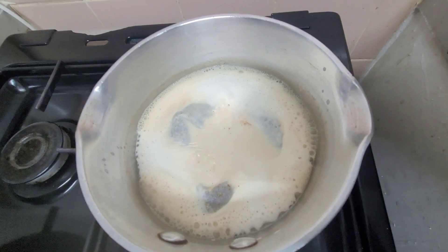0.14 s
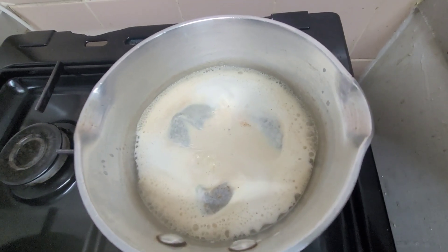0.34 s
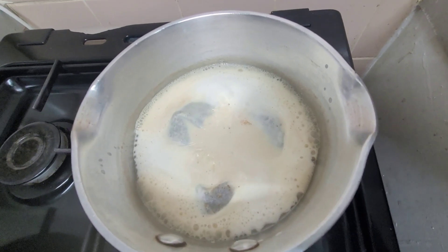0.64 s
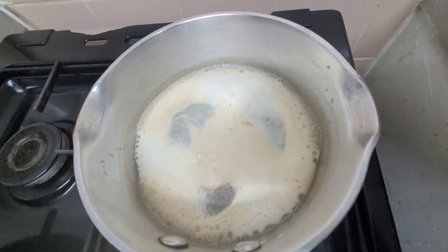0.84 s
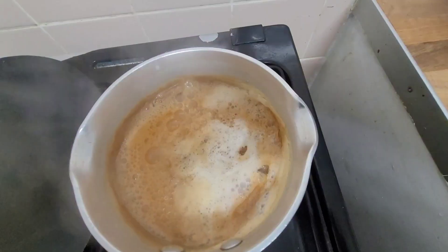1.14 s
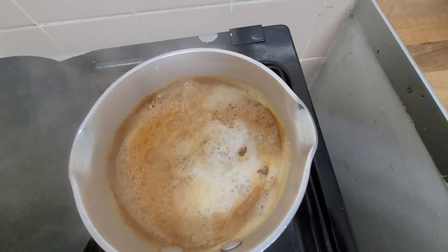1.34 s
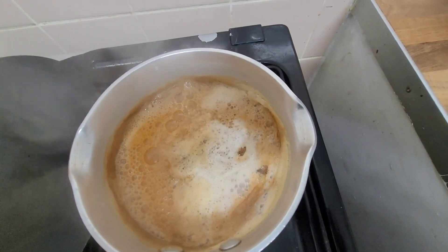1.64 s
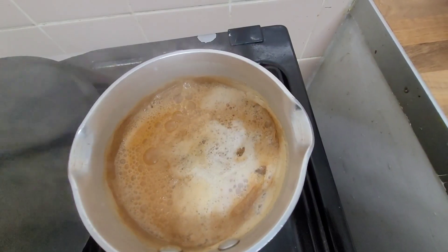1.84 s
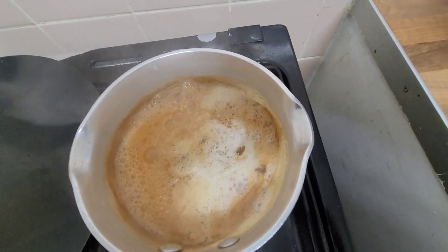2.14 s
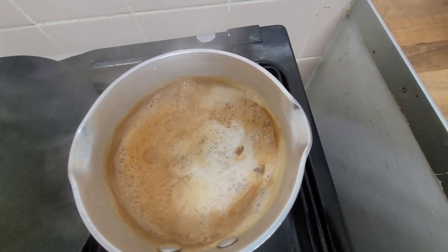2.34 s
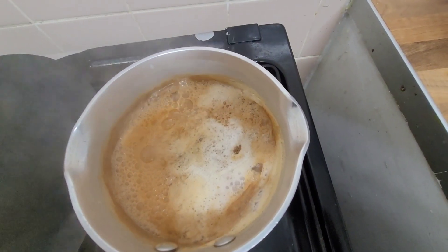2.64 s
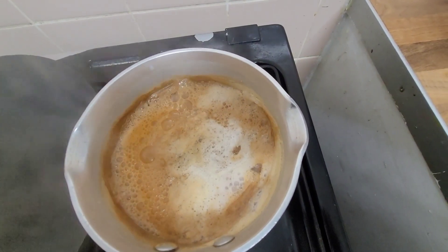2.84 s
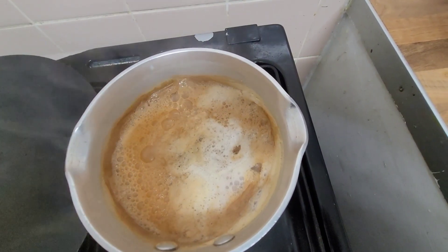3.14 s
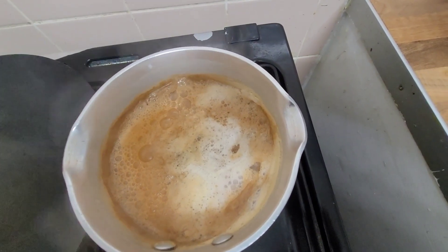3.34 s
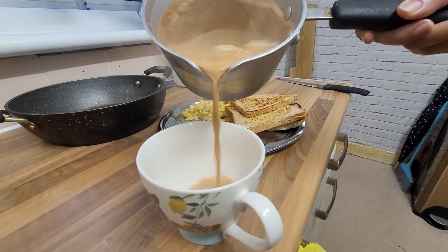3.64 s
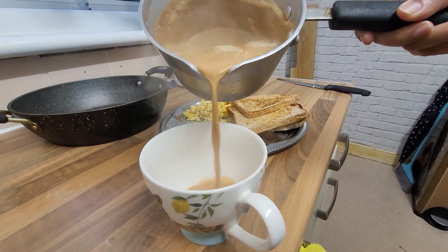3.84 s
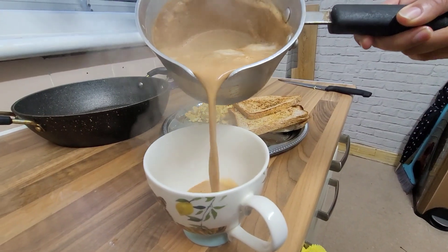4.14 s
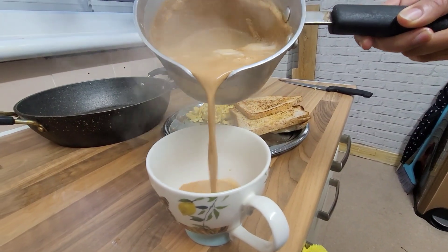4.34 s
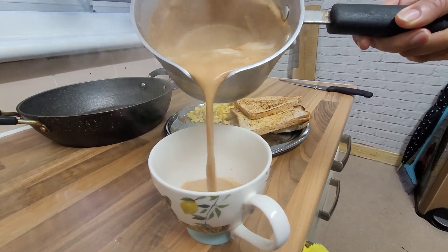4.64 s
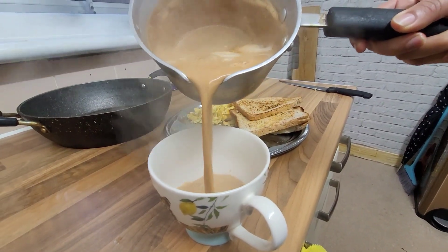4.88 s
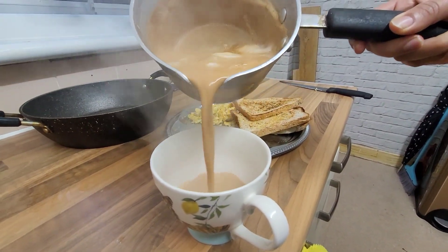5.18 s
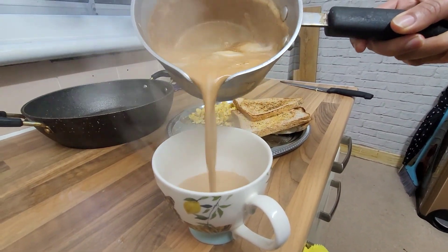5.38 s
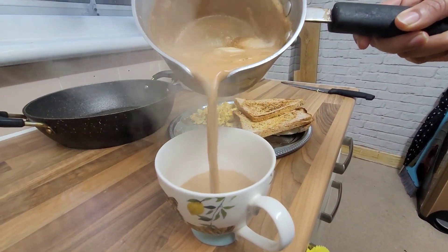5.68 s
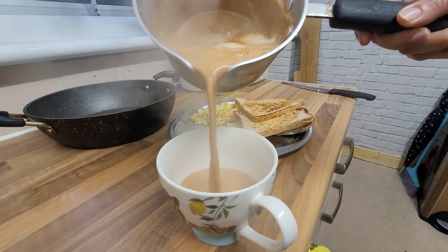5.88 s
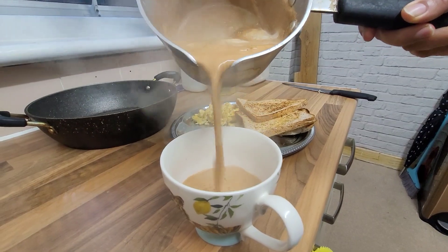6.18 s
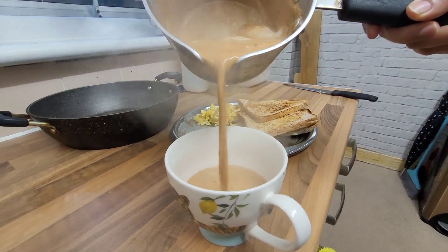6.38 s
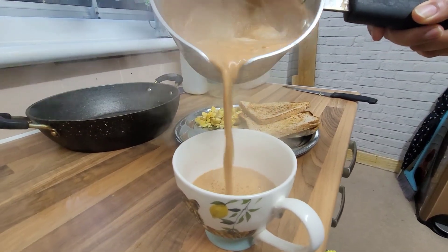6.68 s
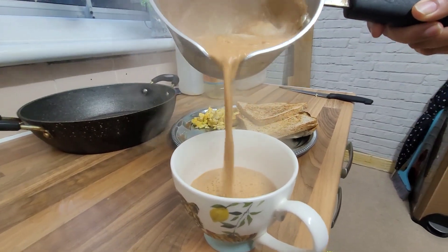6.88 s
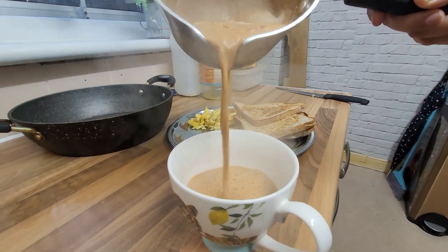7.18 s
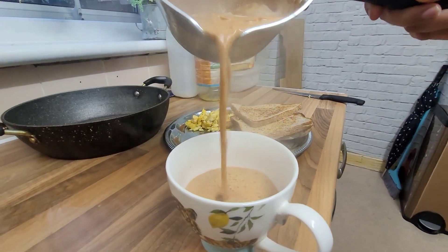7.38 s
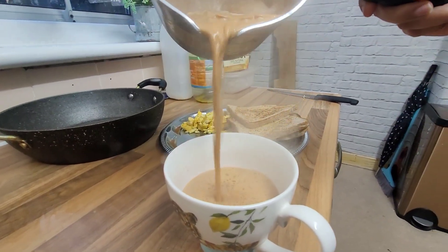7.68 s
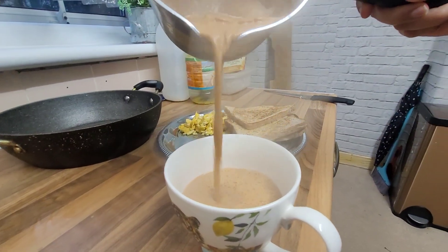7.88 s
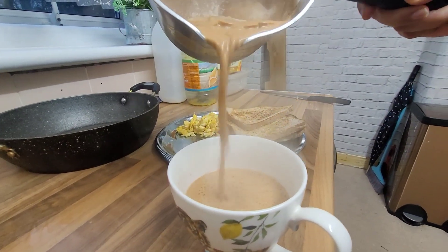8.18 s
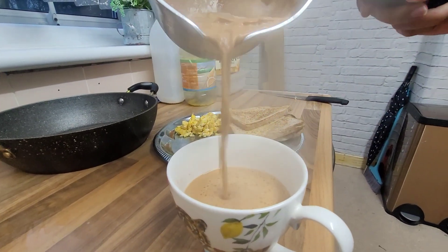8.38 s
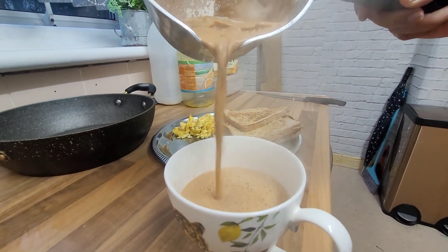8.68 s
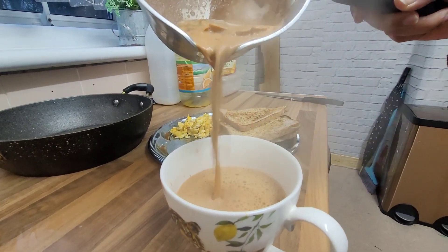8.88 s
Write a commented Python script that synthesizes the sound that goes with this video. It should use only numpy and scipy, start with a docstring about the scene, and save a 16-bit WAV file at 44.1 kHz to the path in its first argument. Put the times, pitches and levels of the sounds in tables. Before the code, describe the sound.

Kitchen crockery rattles and stops abruptly, faint hum and clinks follow, then hot tea splashes, plops and crackles with froth in a filling cup.

```python
"""Milky tea on a gas hob

In a tiled kitchen dishes clatter off to the right, as noise flurries and decaying modes, over the filtered noise
of a gas burner. This stops dead; after a short silence the tea simmers, an appliance hums and crockery clinks.
Then the tea is poured into a cup close by: decaying sine bubbles splash, plop and crackle as froth, stronger as
the pool deepens, while resonators and echoes stand for the cup. Cutlery clinks twice in quick succession
across the room."""
import sys
import numpy as np
from scipy import signal
from scipy.fft import rfft, irfft
from scipy.io import wavfile
from scipy.ndimage import uniform_filter1d

SR = 44100
rng = np.random.default_rng(int(sys.argv[2]) if len(sys.argv) > 2 else 0)


def unload_audio(sound):
    """Save the sound as a 16-bit wav file, at the path given as the first command line argument."""
    columns = np.transpose(np.atleast_2d(sound))
    # keep every value between -1 and 1, then stretch to whole-number steps
    steps = np.round(np.clip(columns, -1, 1) * 32767)
    wavfile.write(sys.argv[1], SR, steps.astype(np.int16))


N = 397782  # length in samples
CUT_S, RESUME_S, POUR_S = .977, 1.056, 3.40  # clatter stops, simmering is heard, pouring starts
TOP_HZ = 16000  # upper limit of the recorder
PORT_LAG = 14  # samples by which the right port hears later

# Knocks of dishes on the worktop. Each row: start in seconds, relative level in dB,
# decay of the rattle in seconds, treble tilt (positive is brighter).
KNOCKS = [(0.0, -26, .026, 5), (.021, -25, .016, 3), (.086, -34.5, .023, -0.5), (.341, -31.5, .0043, 1),
          (.566, -33.5, 0.0098, -1.5), (.63, -40, .069, 4.5), (0.675, -27.5, .0071, 4),
          (.685, -21, .041, 4), (.712, -20, .027, 1), (.76, -20.5, .008, 3), (.768, -16.5, .0027, 5.5),
          (.791, -26, .0045, 1.5), (.885, -27.5, .028, 2.5)]
# Colour of dishes knocking. Each row: frequency in Hz, gain in dB.
DISH_COLOUR = [(50, -5), (160, -6.5), (260, 1.5), (520, -6), (750, -1), (1150, -1.5), (1500, -1),
               (2600, -2), (3300, -9), (5700, -20.5), (7200, -28.5), (9100, -44.5), (16000, -44.5)]
# Modes of the pile of dishes. Each row: frequency in Hz, level in dB, t60 in seconds (ring() caps it).
DISH_MODES = [(766.7, -3, 0.29), (1080, -11, .2), (1235, -2.5, .25), (1560, -0.5, 0.065), (1723, 2.5, 0.15),
              (1840, -1, .2), (2357, 0.5, 0.13), (2572, 7, .2), (2660, -1.5, 0.46), (3300, -3.5, 0.067),
              (3820, -6, .2), (4619, -17.5, 0.198)]
# Light blows on kitchenware. Each row: start in seconds, relative level in dB, object struck.
BLOWS = [(1.294, -45, "bowl"), (1.505, -39, "bowl"), (1.626, -44.5, "dishes"), (1.640, -68, "dishes"),
         (1.661, -38, "plate"), (1.667, -35.5, "plate"), (1.749, -47.5, "plate"), (1.994, -48, "dishes"),
         (7.895, -36.5, "spoon"), (7.902, -48, "spoon")]
# Modes of bowl, plate and spoon. Each row: frequency in Hz, level in dB, t60 in seconds (ring() caps it).
BOWL_MODES = [(861, -19, .2), (1658, -16, .2), (2535, 0, .22), (2670, -4, .2), (6950, -16, .11),
              (8100, -31, .11)]
PLATE_MODES = [(829, -9.5, .3), (1640, -6.5, .17), (2293, 9, 0.051), (2374, 3.5, 0.067), (2484, 5.5, 0.05),
               (3310, 1, 0.07), (4010, -1.5, 0.092), (4900, -5.5, 0.069), (5400, -16, 0.11),
               (6500, -13.5, 0.072), (7300, -18, 0.11), (7950, -17.5, 0.13), (9500, -28.5, .15)]
SPOON_MODES = [(960, -1.5, .1), (1420, -5, .09), (2300, 11, .075), (2610, 8, 0.051), (2880, 3, 0.089),
               (4700, 3, 0.064), (5750, -3, 0.094), (6840, -2, 0.098), (7700, -10, 0.22), (9500, -22, .17),
               (11100, -6, 0.14), (12300, 0, .1), (13530, -12, .13)]

# Spectra of the burner and of the kitchen around the simmering pan. Each row: frequency in Hz, gain in dB.
BURNER_SPECTRUM = [(20, -16.5), (45, -3), (140, -5.5), (280, -9), (580, -17), (820, -11), (1400, -23),
                   (2000, -13.5), (2900, -13.5), (5400, -24.5), (6800, -21.5), (9000, -33.5),
                   (11500, -27.5), (16000, -30.5)]
SIMMER_SPECTRUM = [(25, -31), (50, -0.5), (75, -10.5), (140, -5.5), (185, -6.5), (257, -1.5), (450, -12.5),
                   (900, -16), (1600, -19.5), (2800, -29.5), (3900, -39.5), (6000, -38), (7100, -27.5),
                   (8300, -47.5), (16000, -47.5)]
# Lines of the appliance hum. Each row: frequency in Hz, relative level in dB.
HUM_LINES = [(51, -85), (99.6, -60.5), (160, -67), (257, -71.5), (345, -70), (592, -79), (752, -75)]

# Colours of splashing and of froth. Each row: frequency in Hz, gain in dB.
SPLASH_COLOUR = [(200, -8), (450, 1), (720, -2.5), (1100, 7), (1400, 6), (1700, -4.5), (2700, 6.5),
                 (4000, -10), (9000, -39)]
FROTH_COLOUR = [(900, 4), (2000, -2.5), (2800, -1), (5000, 8), (7000, 1), (8800, 1), (15000, -49)]
# Biggest pockets of air under the stream. Each row: time in seconds, level of the dry pop in dB, pitch in Hz.
BIG_PLOPS = [(4.0926, -32.5, 1150), (4.6189, -32.5, 1350), (4.7236, -32, 1300), (5.0463, -34, 1190),
             (5.1359, -31.5, 1100), (5.1693, -32.5, 920), (5.6332, -32.5, 800), (5.8042, -25.5, 940),
             (5.8207, -33, 940), (5.866, -30, 790), (6.443, -26, 980), (6.472, -23.5, 1015),
             (6.69, -28.5, 995), (7.1945, -28, 1170), (7.233, -28.5, 1020), (7.4654, -25, 1360),
             (7.8337, -28, 1170), (8.0457, -29.5, 950), (8.367, -31, 1370), (8.4472, -27, 1170),
             (8.5148, -25, 1390), (8.552, -27, 900), (8.6885, -24, 1480), (8.7894, -19, 1250),
             (8.9021, -20, 1700)]
# Loudest droplets and froth bursts. Each row: time in seconds, relative level in dB, pitch in Hz.
BIG_TICKS = [(3.4058, -38.5, 4200), (3.444, -24, 3220), (3.6461, -35, 4700), (3.95, -33.5, 4170),
             (4.182, -32.5, 9600), (4.3752, -33, 3580), (4.398, -29.5, 4470), (4.968, -31.5, 2950),
             (5.057, -31.5, 3100), (5.3368, -33.5, 2950), (5.5791, -37.5, 3670), (5.805, -34, 2670),
             (6.1722, -31, 5630), (6.4427, -35, 3650), (6.5732, -36, 5340), (6.6371, -43, 4800),
             (6.894, -30.5, 4520), (7.242, -36, 9700), (7.3104, -32, 7060), (7.5412, -36, 7450),
             (8.2334, -32, 6460), (8.288, -37.5, 9200), (8.435, -33.5, 6800), (8.686, -32, 5540),
             (8.7957, -31, 10100), (8.9026, -19.5, 6000), (8.9892, -27, 5400)]
# Early echoes off cup wall, pan and tiles. Each row: delay in seconds, gain as a factor.
EARLY_ECHOES = [(.00135, -0.088), (.0029, -0.097), (.0093, .15)]
# Colour of one port against the other, for the cup, for sources on the right and for steady noise.
# Each row: frequency in Hz, gain in dB.
RIGHT_PORT = [(100, -10.5), (400, -2.5), (1000, 0), (1600, 3), (2600, 2), (3800, -8), (5200, -2), (6800, 7),
              (8500, -10), (11000, 6.5), (15000, -10.5)]
LEFT_PORT = [(60, -2.5), (200, -3), (700, -1.5), (1300, -5.5), (2400, -12), (4000, -7.5), (7000, -7),
             (9000, -5.5), (15000, -4.5)]
LEFT_AMBIENCE = [(50, -4), (130, -4), (240, -2), (400, -5.5), (1200, -3), (2000, -15.5), (3000, -11.5),
                 (4000, -5), (7000, -9.5), (8300, -3), (15000, 2.5)]
# Swells of the cup's low note. Each row: middle in seconds, length in seconds, level in dB.
CUP_SWELLS = [(4.3, 0.075, -54.5), (4.864, 0.35, -53), (5.678, 0.2, -50.5), (6.583, .18, -49),
              (7.277, 0.11, -51), (8.562, 0.096, -50.5), (8.947, 0.078, -49.5)]
# Resonances of the air in the cup. Each row: frequency in Hz, bandwidth in Hz, gain in dB.
CUP_AIR_MODES = [(707, 62, 4.5), (1023, 42, 0), (1150, 45, -3.5), (1390, 61, 8), (1770, 3.3, 11),
                 (2795, 60, -11.5), (4690, 800, 2)]
# Course of the froth. Each row: time in seconds, relative crackle level in dB, relative fizz level in dB.
FROTH_COURSE = [(3.4, -88, -86), (3.65, -70.5, -77), (3.95, -61.5, -76), (4.12, -56, -69), (4.65, -62, -83),
                (5.03, -57.5, -79), (5.2, -67.5, -91), (5.62, -64, -100), (6.09, -68.5, -84),
                (6.42, -58.5, -73.5), (6.95, -67, -78), (7.37, -60, -71), (7.83, -59.5, -73.5),
                (8.02, -57.5, -70), (8.78, -59.5, -75), (9.02, -59.5, -71)]

CUP_HZ = 313.6  # low note of the cup
SPLASH_DB, DEEP_AT_S, DEEPEN_DB_PER_S = -57, 5.7, 12.5  # splash grows until the pool is deep, then holds
# Answers to an event: level against it in dB, amplitude decay constant in seconds.
WASH_DB, WASH_S = -27, 0.053  # splashing after a plop
SHOWER_DB, SHOWER_FIZZ_DB, SHOWER_S = -29, -42, 0.065  # froth and fizz after a burst
RUMBLE_DB, RUMBLE_DB_PER_S = -55.5, 3.5  # level reached at the end, growth
THUD_HZ, THUD_DB, THUD_CYCLES = 144.3, -12, 7.4  # worktop: pitch, level against the knock, decay in cycles
SNAP_HZ = 14800  # pitch of the smallest bubbles


def undb(db):
    """Decibel law: level to amplitude gain."""
    return 10 ** (np.asarray(db) / 20)


def unit(x):
    """Normalisation to rms 1."""
    return x / np.sqrt(np.mean(x ** 2) + 1e-20)


def add(track, s, x):
    """Superposition: mix x into the track from time s on."""
    i = max(int(s * SR), 0)
    n = max(min(x.shape[-1], N - i), 0)
    track[..., i:i + n] += x[..., :n]


def colour(x, points):
    """Minimum-phase filtering: the folded cepstrum makes the (Hz, dB) gain curve causal."""
    hz, db = np.transpose(points)
    size = 4096
    f = np.maximum(np.fft.rfftfreq(size, 1 / SR), 1)
    gain = undb(np.interp(np.log(f), np.log(hz), db))
    cepstrum = irfft(np.log(gain))
    cepstrum[1:size // 2] *= 2
    cepstrum[size // 2 + 1:] = 0
    impulse = irfft(np.exp(rfft(cepstrum)))
    return signal.fftconvolve(x, impulse)[:len(x)]


def walk(rate):
    """Slow fluctuation: held random values, `rate` a second, smoothed twice to a spread near 1."""
    k = int(SR / rate)
    steps = np.repeat(rng.standard_normal(N // k + 1), k)
    return unit(uniform_filter1d(uniform_filter1d(steps, k), k)[:N])


def diffuse(n, alike_hz=520):
    """Diffuse field: noise at two close ports is alike in the bass and unrelated in the treble."""
    mid, side = rfft(rng.standard_normal((2, n)))
    alike = np.exp(-(np.fft.rfftfreq(n, 1 / SR) / alike_hz) ** 2) * .95
    mid = mid * np.sqrt((1 + alike) / 2)
    side = side * np.sqrt((1 - alike) / 2)
    return irfft(np.array([mid + side, mid - side]), n)


def kitchen(x, t60, treble_t60):
    """Reverberation: convolution with exponentially dying noise of unit energy, given t60s in seconds."""
    t = np.arange(SR) / SR
    noise = diffuse(SR)
    low = signal.sosfilt(signal.butter(1, 3000, fs=SR, output="sos"), noise)
    tail = low * undb(-60 * t / t60) + (noise - low) * undb(-60 * t / treble_t60)
    tail *= np.minimum(t / .004, 1)
    return signal.fftconvolve(x[None], unit(tail) / np.sqrt(SR), axes=1)[:, :N]


def ring(modes, crack_db, crack_s, split=.008):
    """Modal vibration: a blow excites split, decaying modes and a noise crack; rms 1 over 30 ms."""
    t = np.arange(SR // 2) / SR
    tone = 0
    for hz, db, t60 in modes:
        for side in (-1, 0, 1):
            pitch = hz * (1 + side * split * rng.uniform(.4, 1.6))
            fade = undb(db - 7 * abs(side) - 60 * t / min(t60, .24))
            tone = tone + fade * np.sin(2 * np.pi * (pitch * t + rng.random()))
    tone *= np.minimum(t / .001, 1)
    head = int(.03 * SR)
    crack = undb(crack_db) * rng.standard_normal(len(t)) * np.exp(-t / crack_s)
    x = tone / np.std(tone[:head]) + crack
    return x / np.std(x[:head])


def bubble(hz, cycles):
    """Bubble resonance: a sine decaying by 1/e in the given number of cycles; peak 1."""
    turns = np.arange(int(6 * cycles * SR / hz) + 4) * hz / SR
    x = np.sin(2 * np.pi * turns) * np.exp(-turns / cycles)
    return x / np.abs(x).max()


def grains(rate, low_hz, high_hz, cycles, spread_db):
    """Random superposition: about `rate` bubbles a second, a few much louder than the rest; rms 1."""
    out = np.zeros(N)
    for hz in np.geomspace(low_hz, min(high_hz, .42 * SR), num=12):
        count = int(rate / 12 * N / SR) + 1
        when, chance = rng.random((4000, 2))[:count].T
        size = undb(spread_db * np.minimum(-np.log(1 - chance), 4))
        pulses = np.bincount((when * N).astype(int), size, N)
        out += signal.oaconvolve(pulses, bubble(hz, cycles))[:N]
    return unit(out - out.mean())


def across_room(x, direct_db, t60, treble_t60):
    """Direct and reverberant field: a source across the kitchen, with the left port in shadow."""
    direct = np.array([x, np.pad(x, (PORT_LAG, 0))[:N]])
    left, right = kitchen(x, t60, treble_t60) + undb(direct_db) * direct
    return np.array([colour(left, LEFT_PORT), right])


def tick(hz, t):
    """Impulsive excitation: a noise crackle swells to 5 ms, dies and drives one bubble pitch; peak 1."""
    t = t[:SR // 50] - .005
    envelope = np.exp(-np.abs(t) / 0.00017) + undb(-12.5) * np.exp(-np.abs(t) / 0.0032)
    x = signal.fftconvolve(rng.standard_normal(len(t)) * envelope, bubble(hz, cycles=0.91))
    return x / np.abs(x).max()


def scatter(start_s, count, db, spread_db, hz, octaves):
    """Jittered succession: one lesser event per time slot, as rows of (s, dB, Hz)."""
    when, size, pitch = rng.uniform(-1, 1, (count, 3)).T
    slot_s = (N / SR - start_s) / count
    s = start_s + (np.arange(count) + (1 + when) / 2) * slot_s
    return list(zip(s, db + spread_db * size, hz * 2 ** (octaves * pitch)))


def aftermath(events, settle_s, t):
    """Relaxation: agitation jumps at each event and decays; the powers add."""
    power = np.zeros(N)
    for s, db, _ in events:
        add(power, s, (undb(db) * np.exp(-t[:SR] / settle_s)) ** 2)
    return np.sqrt(power)


def clatter(t):
    """Repeated contact: each knock is a dying noise flurry that faintly excites the dish modes."""
    contacts, n = np.zeros(N), SR // 4
    for s, db, length, tilt in KNOCKS:
        flurry = rng.standard_normal(n) * np.exp(-t[:n] / length) * np.minimum(t[:n] / .003, 1)
        flurry = colour(flurry, [(250, -2 * tilt), (1000, 0), (8000, 3 * tilt)])
        flurry = colour(flurry, DISH_COLOUR)
        add(contacts, s, undb(db) * flurry / np.std(flurry[:SR // 50]))
    body = ring(DISH_MODES, crack_db=-20, crack_s=.003)
    ringing = unit(signal.fftconvolve(contacts, body)[:N]) * np.std(contacts) * undb(-14)
    return across_room((contacts + ringing) * undb(2.0), direct_db=-1, t60=0.49, treble_t60=0.31)


def ambience(spectrum, db, flicker_db):
    """Broadband noise: a coloured diffuse rush whose level flutters about db at the right port."""
    left, right = (colour(x, spectrum) for x in diffuse(N))
    level = undb(db + flicker_db * walk(14))
    return np.array([colour(left, LEFT_AMBIENCE), right]) / np.std(right) * level


def hum(t):
    """Line spectrum: low tones of an appliance, wavering in level and phase."""
    x = np.zeros(N)
    for hz, db in HUM_LINES:
        level = np.sqrt(2) * undb(db + walk(4.9))
        x += level * np.sin(2 * np.pi * hz * t + 0.25 * walk(3.04))
    return np.array([undb(-5.5) * x, x])


def simmer(t):
    """Frequency modulation: a faint whistle from the hot pan wanders in pitch, with three tiny pops."""
    pitch = 3400 + 15 * walk(5) + 70 * walk(250)
    x = undb(-84 + 2 * walk(6)) * np.sin(2 * np.pi * np.cumsum(pitch) / SR)
    for s in rng.uniform(RESUME_S, POUR_S, size=3):
        add(x, s, undb(-58) * tick(6000, t))
    return x * (t < POUR_S)


def clinks():
    """Impact on resonant bodies: kitchenware rings, and the worktop answers with a knock and thud."""
    out = np.zeros(N)
    for s, db, thing in BLOWS:
        # a crack far above the modes makes the knock dry
        knock = unit(colour(ring(DISH_MODES, crack_db=26, crack_s=.007), DISH_COLOUR)[:SR // 30])
        if thing == "bowl":
            blow = undb(-7) * ring(BOWL_MODES, crack_db=-37, crack_s=0.0036, split=0.0176)
            knock_db = -8
        elif thing == "plate":
            blow = undb(2.5) * ring(PLATE_MODES, crack_db=-24, crack_s=0.006, split=0.0214)
            knock_db = -3
        elif thing == "spoon":
            blow = undb(5.0) * ring(SPOON_MODES, crack_db=1.0, crack_s=0.016, split=0.026)
            knock_db = -4
        else:  # dishes: the knock alone
            blow, knock_db = np.zeros(1), 2
        add(out, s, undb(db) * blow)
        add(out, s, undb(db + knock_db) * knock)
        add(out, s, undb(db + knock_db + THUD_DB) * bubble(THUD_HZ, cycles=THUD_CYCLES))
    return across_room(out, direct_db=-0.5, t60=0.35, treble_t60=0.2)


def bump(t):
    """Damped oscillation: a soft deep thump of handling, then a dull swell of rustling noise."""
    points = [(200, -10), (600, 7), (1200, -6), (2500, -22), (8000, -45)]
    rustle = unit(colour(rng.standard_normal(N), points))
    x = undb(-59.5) * rustle * np.exp(-((t - 3.37) / 0.12) ** 2)
    t = t[:SR // 4]
    thump = np.sin(2 * np.pi * 56 * t) * np.exp(-t / 0.022) * np.minimum(t / 0.005, 1)
    add(x, 3.262, undb(-38.0) * thump)
    return x


def pour(t):
    """Source and resonator: the stream's bubbles and froth excite echoes, cup air and the room."""
    stream = splashing(t) + frothing(t) + trickle(t) + rumble(t)
    x = stream * (t > POUR_S) + plops(t) + ticks(t)
    near = x.copy()
    for s, gain in EARLY_ECHOES:
        add(near, s, gain * x)
    for hz, width, db in CUP_AIR_MODES:
        near += undb(db) * signal.lfilter(*signal.iirpeak(hz, hz / width, fs=SR), x)
    near += cup_note(t)
    direct = np.array([near, np.pad(near, (PORT_LAG, 0))[:N]])
    left, right = direct + undb(-6) * kitchen(x, t60=.33, treble_t60=.22)
    return np.array([left, colour(right, RIGHT_PORT)])


def splashing(t):
    """Bubble entrainment: blunt bubbles and gurgles, louder as the pool deepens and after each big plop."""
    steady = undb(SPLASH_DB - DEEPEN_DB_PER_S * np.maximum(DEEP_AT_S - t, 0))
    wash = undb(WASH_DB) * aftermath(BIG_PLOPS, WASH_S, t)
    splash = grains(rate=280, low_hz=440, high_hz=1630, cycles=0.65, spread_db=5.5)
    splash = unit(colour(splash, SPLASH_COLOUR))
    gurgle = grains(rate=100, low_hz=645, high_hz=1535, cycles=2.1, spread_db=4.5)
    return (splash + 0.35 * gurgle) * np.hypot(steady, wash)


def froth_level(t):
    """Linear interpolation of the relative crackle and fizz levels in dB at the times t."""
    s, *columns = np.transpose(FROTH_COURSE)
    return [np.interp(t, s, c) for c in columns]


def frothing(t):
    """Film rupture: many small bubbles crackle and fizz, with a shower after each big burst."""
    froth_db, fizz_db = froth_level(t)
    shower = aftermath(BIG_TICKS, SHOWER_S, t)
    froth = grains(rate=1100, low_hz=1710, high_hz=8030, cycles=3.9, spread_db=5.0)
    froth = unit(colour(froth, FROTH_COLOUR))
    fizz = grains(rate=900, low_hz=6960, high_hz=15600, cycles=1.0, spread_db=7.0)
    fizz = unit(colour(fizz, [(3000, -24), (8000, -9.5), (15000, -2)]))
    froth *= np.hypot(undb(froth_db - 3.5), undb(SHOWER_DB) * shower)
    fizz *= np.hypot(undb(fizz_db + 4), undb(SHOWER_FIZZ_DB) * shower)
    return froth + fizz


def trickle(t):
    """Lightly damped resonance: small bubbles ring longer and follow the level of the crackle."""
    bubbles = grains(rate=260, low_hz=2107, high_hz=4470, cycles=7.5, spread_db=2.5)
    shower = undb(-35.5) * aftermath(BIG_TICKS, SHOWER_S, t)
    return bubbles * np.hypot(undb(froth_level(t)[0] - 7), shower)


def rumble(t):
    """Low bubble resonance: large bubbles churn deep in the cup, louder as it fills."""
    churn = grains(rate=240, low_hz=155, high_hz=417, cycles=1.4, spread_db=2.0)
    churn = unit(colour(churn, [(60, -24), (140, -4.5), (450, -1.5), (1200, -19)]))
    return churn * undb(RUMBLE_DB + RUMBLE_DB_PER_S * (t - t[-1]))


def ticks(t):
    """Small impacts: droplets and froth bursts, thin and bright; the lesser follow the crackle level."""
    x = np.zeros(N)
    lesser = scatter(start_s=POUR_S, count=40, db=19.5, spread_db=2.5, hz=4430, octaves=0.82)
    lesser = [(s, db + froth_level(s)[0], hz) for s, db, hz in lesser]
    for s, db, hz in BIG_TICKS + lesser:
        burst = undb(db + 1.0) * tick(hz, t)
        snap = undb(db - 5) * (hz / 7000) ** 2 * tick(SNAP_HZ, t)  # the smallest bubbles snap brightest
        add(x, s - .005, burst)  # the crackle peaks at s
        add(x, s - .005, snap)
    return colour(x, [(700, -6), (1400, -13), (2400, -1), (7000, 0.0), (11000, -1.0), (15000, 0.5)])


def squeak(t):
    """Narrow-band transient: a tiny high chirp of noise, as of hot liquid spitting on the pan's lip."""
    x = np.zeros(N)
    points = [(4500, -21), (6300, -3), (7200, 3), (8500, -26)]
    fizz = unit(colour(rng.standard_normal(SR // 10), points))
    add(x, 3.983, undb(-30) * fizz * np.exp(-t[:SR // 10] / 0.0015))
    return across_room(x, direct_db=4, t60=0.25, treble_t60=0.36)


def plops(t):
    """Cavity collapse: a blunt pop, a faint ring and a little spray; lesser plops fall among the big."""
    x = np.zeros(N)
    lesser = scatter(start_s=4.4, count=22, db=-34.0, spread_db=3.5, hz=1070, octaves=0.39)
    for s, db, hz in BIG_PLOPS + lesser:
        add(x, s - 1 / hz / 2, undb(db) * bubble(hz, cycles=0.94))
        add(x, s, undb(db - 18) * bubble(hz, cycles=6.3))  # the trapped air rings on faintly
        add(x, s - .005, undb(db - 12) * tick(5500, t))
    return x


def cup_note(t):
    """Cavity resonance: the hollow of the cup sings one low, wavering note in Gaussian swells."""
    size = sum(undb(db) * np.exp(-(2 * (t - s) / length) ** 2) for s, length, db in CUP_SWELLS)
    return np.sqrt(2) * size * np.sin(2 * np.pi * CUP_HZ * t + walk(25))


def scene():
    """Succession: the clatter stops dead; after a short silence the simmering and the pour follow."""
    t = np.arange(N) / SR
    first = clatter(t) + ambience(BURNER_SPECTRUM, db=-39.5, flicker_db=1.0)
    # room tone and hum step up when the pour starts
    room_tone = ambience(SIMMER_SPECTRUM, db=-54.5, flicker_db=0.57) * undb(np.where(t > POUR_S, 1.3, -.3))
    drone = hum(t) * undb(np.where(t > POUR_S, 2.5, -1.5))
    rest = room_tone + drone + simmer(t) + clinks() + bump(t) + pour(t) + squeak(t)
    fade_in = np.clip((t - RESUME_S) / .004, 0, 1)
    return first * (t < CUT_S) + rest * fade_in


def record(dry):
    """Saturation and band limiting: peaks are rounded, the deepest rumble and the top are cut."""
    rounded = np.tanh(dry)
    x = signal.sosfilt(signal.butter(2, 38, "high", fs=SR, output="sos"), rounded)
    return signal.sosfilt(signal.ellip(10, .2, 70, TOP_HZ, fs=SR, output="sos"), x)


dry = scene()
out = record(dry)
unload_audio(out)
```